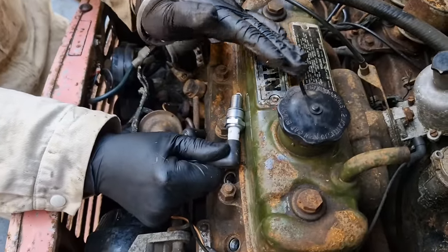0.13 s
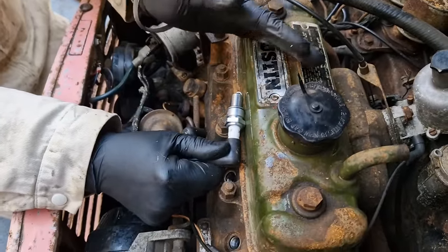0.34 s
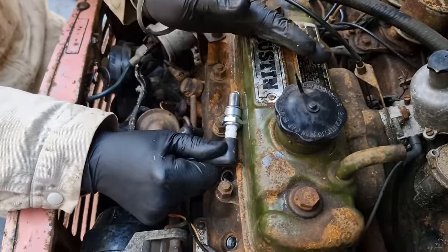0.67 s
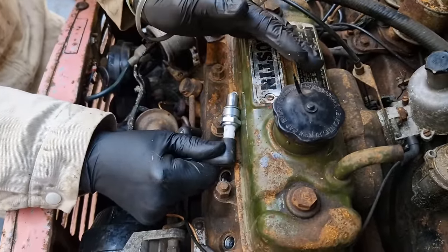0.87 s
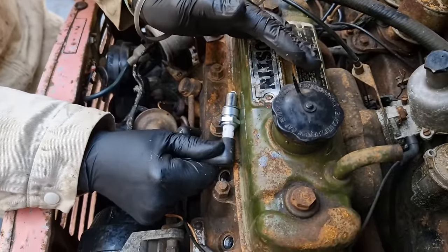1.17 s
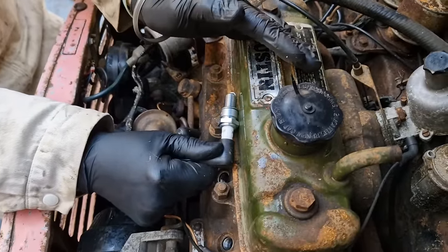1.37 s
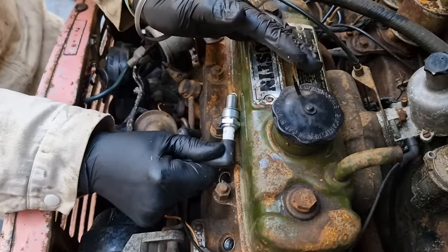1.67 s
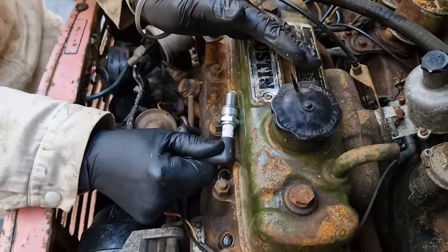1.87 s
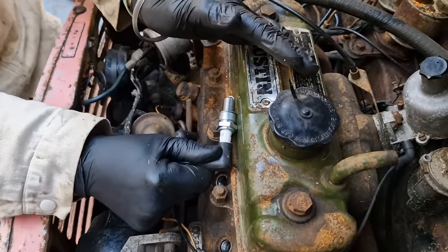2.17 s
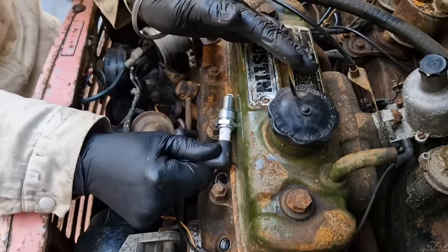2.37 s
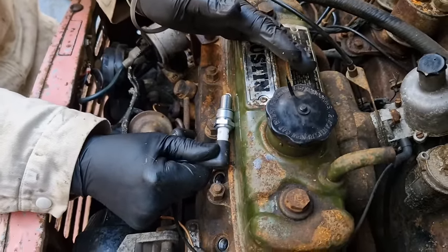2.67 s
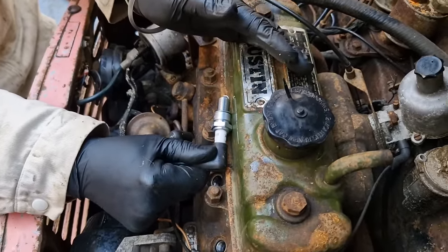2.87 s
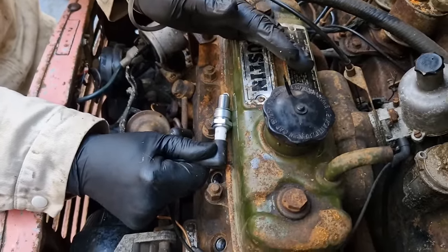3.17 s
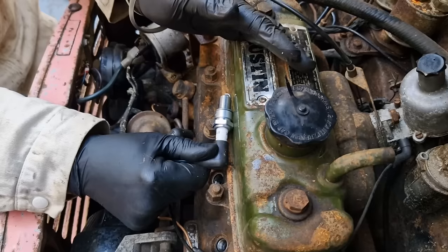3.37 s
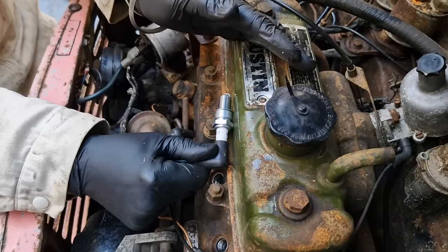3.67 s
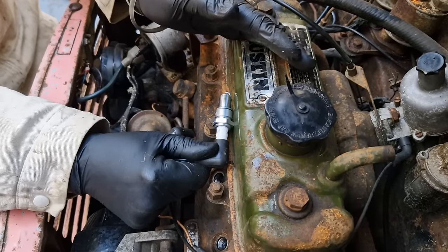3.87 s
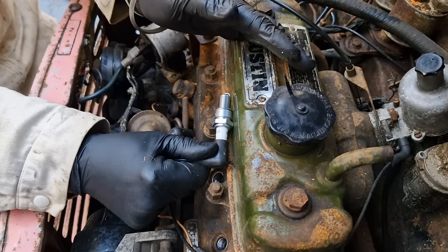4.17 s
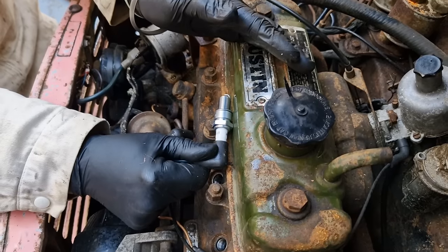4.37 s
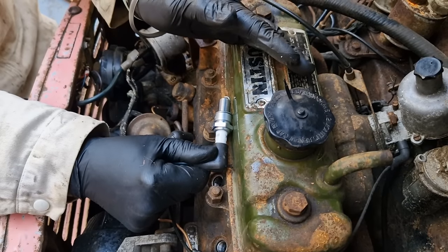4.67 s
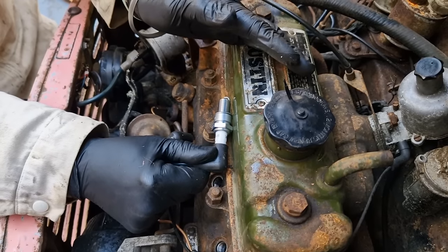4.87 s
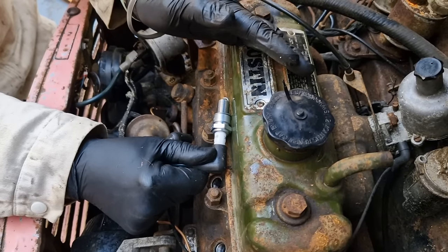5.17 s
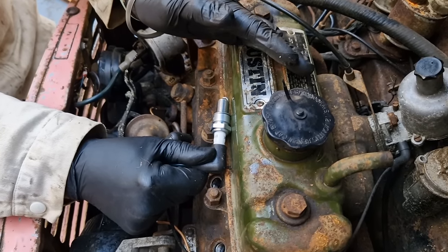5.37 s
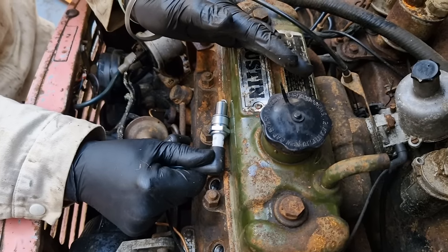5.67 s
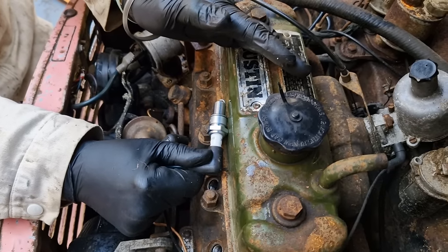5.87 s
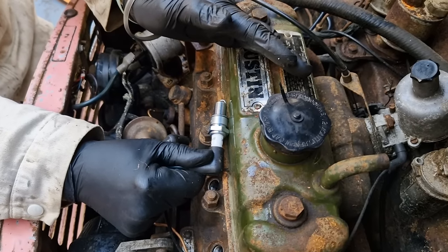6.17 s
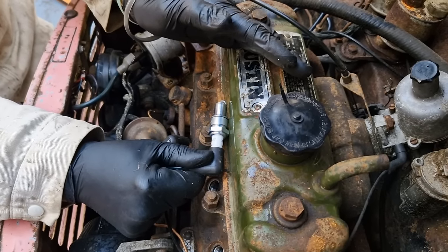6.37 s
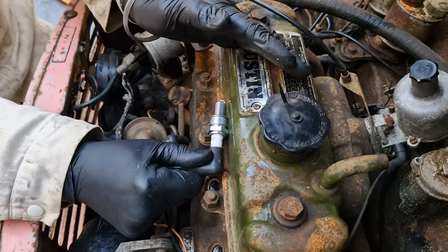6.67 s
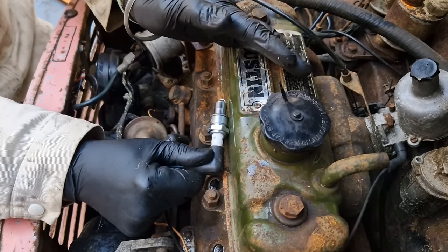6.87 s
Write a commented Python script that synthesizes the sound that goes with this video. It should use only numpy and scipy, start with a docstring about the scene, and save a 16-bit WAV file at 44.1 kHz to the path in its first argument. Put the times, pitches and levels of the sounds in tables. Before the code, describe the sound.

For almost six seconds someone shifts on a car seat: cloth scuffs, tiny trim clicks, one heavy muffled thump of the body, soft hollow knocks, a clear click and a ringing latch. Then the pinion slams loudly into the gear, the block shudders, and a harsh whirring, rattling starter quickly speeds up and cranks on to the end without ignition. Heard just above the engine in a modestly reverberant garage.

```python
"""A starter cranks an old four-cylinder engine that does not fire; garage, stereo pair just above the open bay.
The pinion slams into the ring gear and whines over casing resonances, sagging at every compression;
gears clatter as noise pulsed by each tooth, the block shakes and the brushes hiss as shaped noise.
Before that, struck modes and noise bursts make a dull body thump, floor knocks, clicks and a latch;
small squeaks and scuffs, cloth on a seat, low rumble and faint air are noise through resonances or spectra."""
import sys
import numpy as np
from scipy import signal
from scipy.fft import rfft, irfft, next_fast_len
from scipy.io import wavfile
from scipy.ndimage import map_coordinates

SR = 44100
rng = np.random.default_rng(int(sys.argv[2]) if len(sys.argv) > 2 else 0)


def unload_wav(signal):
    """Save mono or channel-first audio to the path in sys.argv[1] as 16-bit WAV at rate SR, clipped to [-1, 1]."""
    wavfile.write(
        sys.argv[1],
        SR,
        np.round(np.clip(np.atleast_2d(signal).T, -1, 1) * 32767).astype(np.int16),
    )


N = 309582
T = np.arange(N) / SR
LEFT_RIGHT = np.array([[.5], [-.5]])  # splits a left-right difference evenly between the microphones

# The starter runs up from its first bite to a steady tooth rate; the last of the speed comes slowly
START_S, BITE_HZ, CRANK_HZ, RUN_UP_S = 5.83, 175, 478, .1057
CREEP_HZ, CREEP_S = 3.5, .55
# Ring gear teeth between compressions, teeth before the first, share of speed lost at each peak
STROKE_TEETH, FIRST_TEETH, SAG = 53.6, 35.1, .03
PINION_TEETH = 9
# Harmonics of the tooth rate: multiple, level_db
MESH_HARMONICS = [(2, -3), (3, 0), (4, -2.7), (5, -1.5), (6, -3)]
# Starter casing, where the whine surges as it crosses: pitch_hz, width_hz, level_db
CASING_RESONANCES = [(718, 170, -22.5), (931, 21, -18), (1044, 55, -16), (1305, 104, -12.8), (1378, 16, -9),
                     (1435, 20, -11.2), (1488, 16, -4.8), (1531, 25, -7.2), (1676, 45, -17.5),
                     (1760, 22, -19.5), (1895, 60, -24), (2205, 50, -16.5)]
# Whine level, when the teeth are fully in mesh, and how long meshing takes
WHINE_DB, MESHED_S, MESHING_S = -25.6, 5.895, .05
# Teeth bite hard as a compression lets go: centre_s, half_length_s, extra_db
TOOTH_BITES = [(5.965, .011, 3), (6.283, .007, 5), (6.376, .008, 2), (6.468, .005, 4), (6.604, .009, 1.5),
               (6.716, .007, 3.5), (6.825, .011, 1.5)]
# Backlash leaves the teeth floating free: centre_s, level_db
BACKLASH = [(5.989, -9), (6.272, -4), (6.457, -7), (6.499, -7), (6.582, -6.5), (6.696, -3.5), (6.801, -10),
            (6.989, -11)]
BACKLASH_HALF_S = 0.0061
CHOP_DB, JUDDER_DB = 1.1, 1.0  # pulse once a pinion turn; random judder
# Gear clatter spectrum: pitch_hz, level_db
CLATTER_SPECTRUM = [(290, -63), (500, -56), (814, -12.5), (926, -21.5), (1210, -11), (1430, 0.5),
                    (1760, -14.5), (2260, -10.5), (2950, -49), (3450, -38.5), (4500, -42), (5850, -55),
                    (9900, -120)]
# Bell housing: pitch_hz, width_hz, level_db
HOUSING_RESONANCES = [(1060, 81, -8), (1590, 340, -3), (1484, 170, 2.5), (1856, 68, -1), (2218, 370, -8),
                      (2210, 40, 3), (1667, 30, 0), (2844, 200, -9)]
CLATTER_DB, CLATTER_STRAIN_DB = -24.5, 15  # at full speed; extra at a standstill
# Shaking block spectrum: pitch_hz, level_db
SHUDDER_SPECTRUM = [(18, -41), (30, -24), (59, -25), (119, -5.5), (323, -10.5), (394, -7), (604, -16),
                    (658, -10.5), (826, -21.5), (900, -6.5), (1170, -38), (1980, -120)]
SHUDDER_DB, SHUDDER_STRAIN_DB = -37, 19.5  # at full speed; extra at a standstill
# The block heaves as the crankshaft breaks loose: centre, half length, extra shake
LURCH_S, LURCH_HALF_S, LURCH_DB = 5.874, 0.016, 7.5
# Brush hiss spectrum: pitch_hz, level_db
BRUSH_SPECTRUM = [(1760, -45), (3000, -7), (3110, -20), (3500, -16.5), (5340, -4.5), (5890, -6), (6220, -8),
                  (7200, -3), (7720, -1.5), (8690, -4.5), (10100, -15), (14400, -16), (15800, -24)]
# Brush holders: pitch_hz, width_hz, level_db
HOLDER_RESONANCES = [(5160, 70, -6), (5480, 78, -4), (6280, 130, 0), (7545, 80, 5), (7812, 50, 3),
                     (8372, 35, 7), (8740, 25, 2)]
# Full hiss, the tooth rate that reaches it, power of speed below that
BRUSH_DB, BRUSH_FULL_HZ, BRUSH_GROWS = -23.5, 390, 3.7
# Starter's side of the stereo image: pitch_hz, left_minus_right_db
STARTER_LEAN = [(60, -15.5), (110, 1.5), (200, -5.5), (380, -2), (700, 1.5), (1290, -2), (2380, -9.5),
                (4400, 4), (8120, -4), (15000, 1.5)]

# Pinion shoots out, slams, grinds over tooth tips and jolts: start_s, level_db, t60_s, housing_ring_db
ENGAGE_BLOWS = [(5.802, -13, 0.3, -42), (5.8291, -2.5, 0.17, -4), (5.836, -10, .05, -9),
                (5.8787, -13, 0.1, -21), (5.889, -7.5, .05, -16), (5.899, -11, 0.046, -16),
                (6.0065, -8.5, 0.049, -10.5)]
# Spectrum of those steel blows: pitch_hz, level_db
SLAM_SPECTRUM = [(59, -43), (100, -10.5), (372, -14), (441, -23.5), (886, -7), (1100, -12.5), (1350, -19.5),
                 (1940, -10), (2200, -5), (3510, -21.5), (7850, -21.5), (15800, -32)]
# Bell housing ringing on after the slam: pitch_hz, level_db, t60_s
HOUSING_AFTER_RING = [(1325, -10, 0.68), (2190, -3, 0.77), (2120, -2.5, 1)]
AFTER_RING_DB = -21

# Soft blows on the car body, the last as the engine lurches on its mounts: start_s, level_db
BODY_THUMPS = [(1.686, -3), (1.723, -27), (1.77, -21.5), (1.886, -31), (2.019, -39.5), (2.249, -34),
               (2.326, -38.5), (5.876, -16.5), (5.918, -38)]
# Low modes of the body shell: pitch_hz, level_db, t60_s
BODY_MODES = [(110.3, -22.5, 1), (135, -4.5, 0.25), (160, 5, 0.07), (211.1, -7, 0.29), (355.5, -23.5, 0.25),
              (479.4, -28.5, 0.16), (573, -33.5, 0.32)]
# Spectrum of the body panels: pitch_hz, level_db
PANEL_SPECTRUM = [(70, -49.5), (105, -7), (136, -3), (185, -12.5), (227, -18.5), (318, -25.5), (572, -32),
                  (778, -40.5), (849, -39.5), (3000, -57), (3900, -91), (6600, -120)]
# Hollow knocks on the floor pan: start_s, peak_db
FLOOR_KNOCKS = [(2.187, -36.5), (2.568, -32.5)]
# Floor pan modes: pitch_hz, level_db, t60_s
PAN_MODES = [(121.7, -10.5, 0.49), (198, -12.5, 0.26), (279, 14.5, 0.027), (331, 0.5, 0.061),
             (363, -21, 0.33)]

# Small cabin clicks: start_s, level_db, knock_db, tick_db, part_pitch_hz, part_db
CABIN_CLICKS = [(0.177, -55, -1, -12, 1450, 2), (0.976, -52, 2.5, -20, 1800, 2.5),
                (2.791, -60.5, -0.5, -39, 2120, -13), (2.996, -55.5, 3, -36, 2040, -7),
                (3.215, -57.5, 3.5, -24, 2140, -23), (3.6079, -30.5, -9.5, -14, 2250, -7.5),
                (3.661, -49.5, -9, -9, 2480, -8), (4.43, -49, -3, -11.5, 2200, -5.5),
                (4.757, -58, -1, -10, 750, -4), (4.811, -61.5, -6, -17, 880, 0.5)]
# Cabin trim: pitch_hz, width_hz, level_db
TRIM_RESONANCES = [(425, 400, -12.5), (830, 240, 1), (1120, 210, 5), (1480, 166, 8.5), (1800, 1600, -7.5),
                   (2510, 190, 2), (3900, 180, -15)]
# Trim ringing on: pitch_hz, level_db, t60_s
TRIM_MODES = [(194, -1, .39), (318, -4, .49), (1287, -9, .4), (1389, 0, .24), (2665, -6, .17)]
TRIM_RING_DB = -4
# Steel latch snapping and dropping back: start_s, level_db, brightness_hz
LATCH_SNAPS = [(3.979, -39, 7500), (4.057, -44.5, 2000), (4.068, -49, 3500)]
# Latch modes: pitch_hz, level_db, t60_s
LATCH_MODES = [(404, -3, .22), (600, -9, .2), (840, -7, .5), (1030, -6, .15), (1249, -2, .25),
               (1416, -5, .15), (2654, -6, .15), (2770, -6, .36), (3192, -4, .15), (4032, -3, .06),
               (6675, -12, .06)]
# Latch crack spectrum: pitch_hz, level_db
CRACK_SPECTRUM = [(250, -28), (420, -3), (1400, 2), (2000, -10.5), (2700, -1), (3400, -5), (5000, -13.5),
                  (7000, -14), (9000, -34)]

# Pedal or lever squeak: centre_s, level_db, half_length_s
METAL_SQUEAKS = [(4.488, -60, 0.053)]
# Squeak resonances: pitch_hz, width_hz, level_db
SQUEAK_RESONANCES = [(6240, 260, 5), (6640, 140, 2.5), (7500, 240, -3), (9940, 90, -7)]
# Short scuffs: centre_s, level_db, half_length_s, pitch_hz
SHORT_SCUFFS = [(0.563, -64, 0.018, 2210), (1.028, -68, 0.043, 2150), (3.004, -59, 0.029, 780),
                (2.029, -50.5, 0.017, 2700), (2.088, -60, 0.011, 2380), (2.09, -53.5, 0.013, 1330),
                (2.163, -55, .018, 2250), (2.295, -54.5, 0.049, 553), (2.366, -57, 0.032, 613),
                (4.725, -70, 0.032, 3660)]

# Sleeve strokes over upholstery: centre_s, half_length_s, dull_rub_db, bright_swish_db
SLEEVE_STROKES = [(0.006, 0.075, -48, -49), (0.221, 0.044, -60, -54), (0.456, 0.03, -92, -68),
                  (0.869, 0.029, -68, -62), (1.197, 0.37, -70, -79), (1.64, 0.049, -45.5, -54),
                  (1.781, 0.046, -55.5, -58), (1.97, 0.14, -59, -74), (2.137, 0.092, -53, -64.5),
                  (2.322, 0.057, -60, -71), (2.484, 0.059, -59.5, -63.5), (2.638, 0.074, -60.5, -70.5),
                  (4.285, 0.34, -68.5, -73), (5.295, 0.046, -69, -78)]
# Weight shifts on the seat: centre_s, half_length_s, seat_rub_db, low_rumble_db
WEIGHT_SHIFTS = [(0, 0.094, -62, -41.5), (0.678, 0.21, -58, -68), (1.29, 0.11, -57, -50),
                 (1.943, 0.28, -52.5, -46.5), (2.274, 0.2, -50, -54), (2.67, 0.26, -65, -55),
                 (4.22, 0.37, -58.5, -56.5)]
# Spectra of the dull cloth rub, bright swish and seat rub: pitch_hz, level_db
CLOTH_SPECTRUM = [(410, -24), (640, -9), (850, -4.5), (1130, -9), (1370, -2), (2350, -1), (3290, -16),
                  (5000, -34), (6500, -31.5), (11000, -120)]
SWISH_SPECTRUM = [(2060, -37.5), (3500, -6), (5550, -0.5), (6790, -3.5), (7850, 2), (10100, -10.5),
                  (13100, -8), (15800, -14.5)]
SEAT_SPECTRUM = [(70, -11), (120, 3.5), (220, -5), (350, -9), (650, -18), (1000, -22), (2000, -64)]
# Light rustle under and between the strokes, until the sitter settles
FIDGET_END_S, FIDGET_FADE_S, FIDGET_CLOTH_DB, FIDGET_SWISH_DB = 2.79, 0.27, -74, -75.5

# Spectra of the low rumble and the air: pitch_hz, level_db
RUMBLE_SPECTRUM = [(12, -27.5), (20, 12), (92, 13), (157, 3.5), (190, -2), (238, -9), (316, -10.5),
                   (500, -36), (650, -45.5), (1100, -120)]
AIR_SPECTRUM = [(180, -16.5), (300, -6.5), (480, -20), (830, -12.5), (1110, -17.5), (1920, -15),
                (4330, -33), (7740, -24), (10500, -32), (15800, -50.5)]
RUMBLE_DB, AIR_DB = -53.5, -69.5
HUSH_S, HUSH_FADE_S, HUSH_DB = 5.02, 0.21, -3.5  # quieter from here on

# Likeness of noise at the two microphones: pitch_hz, likeness (1 = identical)
STEREO_LIKENESS = [(100, 1), (300, 0.88), (700, 0.74), (1500, 0.025), (3000, 0.048), (7000, 0.053),
                   (15000, 0.165)]
# Garage reverberation: pitch_hz, t60_s
GARAGE_DECAY = [(120, 0.93), (1000, 0.45), (4000, 0.36), (12000, 0.067)]
TOP_HZ = 15870  # the recorder's band limit


def starter():
    """Gear whine, tooth impacts in the housing, the shaking block and the brushes on the commutator."""
    strain, load, tooth_hz = crank_motion()
    teeth = np.cumsum(tooth_hz) / SR
    shaft = 2 * np.pi * teeth / PINION_TEETH
    grip_db = grip(shaft)
    motor = clatter(teeth, strain, load, grip_db) + shudder(strain, load)
    motor = motor + brushes(teeth, shaft, tooth_hz) + whine(teeth, shaft, grip_db)
    running = np.interp(T, [5.828, 5.845], [0, 1])
    return filtered(running * motor, lambda hz: amp(along(STARTER_LEAN, hz) * LEFT_RIGHT))


def crank_motion():
    """Strain (1 stalled, 0 full speed), compression load (-1 to 1) and tooth rate, slowed by compression."""
    since = np.maximum(T - START_S, 0)
    run_up = (CRANK_HZ - BITE_HZ) * np.exp(-since / RUN_UP_S)
    free_hz = CRANK_HZ - run_up - CREEP_HZ * np.exp(-since / CREEP_S)
    teeth = np.cumsum(free_hz * (T > START_S)) / SR
    load = np.cos(2 * np.pi * (teeth - FIRST_TEETH) / STROKE_TEETH)
    return 1 - free_hz / CRANK_HZ, load, free_hz * (1 - SAG * load)


def grip(shaft):
    """How hard the teeth bear, in dB: bites, backlash and the judder of a worn pinion."""
    bites = sum(db * swell(s, half_s, 0) for s, half_s, db in TOOTH_BITES)
    slacks = sum(db * swell(s, BACKLASH_HALF_S, 0) for s, db in BACKLASH)
    return bites + slacks + CHOP_DB * np.cos(shaft) + JUDDER_DB * wobble(130)


def whine(teeth, shaft, grip_db):
    """Tooth harmonics sweep across casing resonances; the slightly eccentric pinion adds sidebands."""
    angle = 2 * np.pi * teeth + .03 * np.sin(shaft) + .025 * wobble(170) + .035 * wobble(30)
    angle = angle + 0.41 * LEFT_RIGHT  # radians: the sound reaches the left microphone first
    tones = 0
    for multiple, db in MESH_HARMONICS:
        contact = 1 + .18 * wobble(80)  # teeth bear unevenly
        tones = tones + amp(db) * contact * np.sin(multiple * angle)
    meshed = 1 - until(MESHED_S, MESHING_S)
    hum = amp(-42.7) * np.sin(3 * shaft)
    gear_tone = amp(WHINE_DB + grip_db) * resonate(meshed * tones, CASING_RESONANCES)
    return garage(gear_tone + meshed * hum, wet_db=-17)


def clatter(teeth, strain, load, grip_db):
    """Each tooth strikes a decaying noise pulse that rings the bell housing; strain makes it rattle more."""
    pulse = np.exp(-(teeth % 1) / 0.48) + 0.11
    impacts = scatter(contact_noise(shared=0.52) * pulse, t60=0.08, share=0.6)
    impacts = impacts * amp(1.14 * wobble(60) - 0.2 * load)  # most when the load lets go
    rattle = amp(CLATTER_DB + CLATTER_STRAIN_DB * strain) * coloured(impacts, CLATTER_SPECTRUM)
    housing = amp(-30.5) * resonate(impacts, HOUSING_RESONANCES)
    return amp(grip_db / 3) * (rattle + housing)


def shudder(strain, load):
    """Scattered noise for the shaking block, stronger under strain and as the crankshaft breaks loose."""
    level_db = SHUDDER_DB + SHUDDER_STRAIN_DB * strain + LURCH_DB * swell(LURCH_S, LURCH_HALF_S, 0)
    shaking = scatter(noise(), t60=0.59, share=0.52)
    return amp(level_db + 0.28 * load) * coloured(shaking, SHUDDER_SPECTRUM)


def brushes(teeth, shaft, tooth_hz):
    """Brush friction hisses and rings the holders, growing with speed up to a limit."""
    level_db = BRUSH_DB + BRUSH_GROWS * 20 * np.log10(np.minimum(tooth_hz / BRUSH_FULL_HZ, 1))
    scrape = scatter(contact_noise(shared=.75), t60=.13, share=.55)
    scrape = scrape * (1 + .23 * np.sin(shaft))  # harder once a turn
    scrape = scrape * (1 + .25 * np.sin(4 * np.pi * teeth))  # chatter from bar to bar, twice a tooth
    hiss = amp(level_db) * coloured(scrape, BRUSH_SPECTRUM)
    return hiss + amp(level_db - 2) * resonate(scrape, HOLDER_RESONANCES)


def engage():
    """Steel blows, noise bursts and housing rings, as the pinion is thrown into mesh and takes up slack."""
    out = np.zeros((2, N))
    for s, db, t60, ring_db in ENGAGE_BLOWS:
        blow = fade(t60, attack=0.0005) * coloured(noise(size=SR), SLAM_SPECTRUM)
        add(out, s, amp(db - 11) * blow)
        add(out, s, amp(ring_db) * ring([(1364, 2, 0.069), (1502, 0, 0.087)], attack=0.000095))
    add(out, START_S, amp(AFTER_RING_DB) * ring(HOUSING_AFTER_RING, attack=0.0047))
    return garage(out, wet_db=-7)


def thumps():
    """The body shell booms at its low modes with its panels; the floor pan knocks hollowly."""
    out = np.zeros((2, N))
    for s, db in BODY_THUMPS:
        panels = amp(-10.5) * fade(0.47, attack=0.005) * coloured(noise(size=SR), PANEL_SPECTRUM)
        add(out, s, amp(db) * (panels - ring(BODY_MODES, attack=0.0055)))
    for s, db in FLOOR_KNOCKS:
        add(out, s, amp(db) * ring(PAN_MODES, attack=0.01))
    # panels radiate no deep bass
    out = signal.sosfilt(signal.butter(4, 97, "highpass", fs=SR, output="sos"), out)
    return garage(out, wet_db=-18.0)


def clicks():
    """Each click rings the trim and its own small part, with a hollow knock, bright tick and dying rattle."""
    out = np.zeros((2, N))
    for s, db, knock_db, tick_db, hz, part_db in CABIN_CLICKS:
        trim = amp(2.0) * fade(0.086, attack=0.0011) * resonate(noise(size=SR), TRIM_RESONANCES)
        part_peaks = [(hz, 0.27 * hz, 0), (1.12 * hz, 0.44 * hz, -3), (1.57 * hz, 0.13 * hz, -8)]
        part = amp(part_db) * fade(0.23, attack=0.00038) * resonate(noise(size=SR), part_peaks)
        hollow = resonate(noise(size=SR), [(198, 26, 4), (350, 180, -8)])
        knock = amp(knock_db - 0.5) * fade(0.3, attack=0.005) * hollow
        tick = amp(tick_db) * fade(0.31, attack=0.0025) * coloured(noise(size=SR), SWISH_SPECTRUM)
        rattle_gain = amp(-28.0 + 1.5 * wobble(74)[:SR]) * fade(0.42, attack=0.0092)
        rattle = rattle_gain * resonate(noise(size=SR), TRIM_RESONANCES)
        trim_ring = amp(TRIM_RING_DB) * ring(TRIM_MODES, attack=0.0015)
        add(out, s, amp(db - 0.5) * (trim + trim_ring + part + knock + tick + rattle))
    return garage(scatter(out, t60=0.04, share=0.21), wet_db=-8.5)


def latch():
    """Each snap cracks and leaves the steel ringing, dulled above its own brightness limit."""
    out = np.zeros((2, N))
    for s, db, bright_hz in LATCH_SNAPS:
        crack = amp(-3.0) * fade(0.21, attack=0.00076) * coloured(noise(size=SR), CRACK_SPECTRUM)
        snap = amp(db) * (ring(LATCH_MODES, attack=0.00091) + crack)
        add(out, s, filtered(snap, lambda hz: 1 / np.hypot(1, (hz / bright_hz) ** 2)))
    return garage(scatter(out, t60=0.035, share=0.4), wet_db=-11.5)


def squeaks():
    """Dry metal rubs briefly on a few high resonances; each scuff sounds one lower resonance."""
    squeal = sum(swell(s, half_s, db) for s, db, half_s in METAL_SQUEAKS)
    out = squeal * resonate(noise(), SQUEAK_RESONANCES)
    rub = noise()
    for s, db, half_s, hz in SHORT_SCUFFS:
        out = out + swell(s, half_s, db) * resonate(rub, [(hz, .25 * hz, 0)])
    return garage(out * amp(0.81 * wobble(90)), wet_db=-9.0)


def rustle():
    """Cloth drags over upholstery in small uneven catches; the seat rubs and rumbles as weight shifts."""
    rub = scatter(noise(), t60=0.11, share=0.43) * amp(1.6 * wobble(110))
    fidget = until(FIDGET_END_S, FIDGET_FADE_S) * amp(2.2 * wobble(12))
    cloth = amp(FIDGET_CLOTH_DB) * fidget + sum(swell(s, half_s, db) for s, half_s, db, _ in SLEEVE_STROKES)
    swish = amp(FIDGET_SWISH_DB) * fidget + sum(swell(s, half_s, db) for s, half_s, _, db in SLEEVE_STROKES)
    seat = sum(swell(s, half_s, db) for s, half_s, db, _ in WEIGHT_SHIFTS)
    heave = sum(swell(s, half_s, db) for s, half_s, _, db in WEIGHT_SHIFTS)
    sleeve = cloth * coloured(rub, CLOTH_SPECTRUM) + swish * coloured(rub, SWISH_SPECTRUM)
    return sleeve + seat * coloured(rub, SEAT_SPECTRUM) + heave * coloured(noise(), RUMBLE_SPECTRUM)


def background():
    """A low rumble and faint air, both a little quieter from just before the start."""
    hush_db = HUSH_DB * (1 - until(HUSH_S, HUSH_FADE_S))
    rumble = amp(RUMBLE_DB + 0.3 * wobble(20)) * coloured(noise(), RUMBLE_SPECTRUM)
    air = amp(AIR_DB + 0.75 * wobble(9.9)) * coloured(noise(), AIR_SPECTRUM)
    return amp(hush_db) * (rumble + air)


def garage(x, wet_db):
    """x with the room's answer, 4 ms later; the treble dies first."""
    hz, t, z = signal.stft(noise(size=SR), SR, nperseg=256)
    decay = amp(-60 * t / along(GARAGE_DECAY, hz)[:, None])
    tail = signal.istft(z * decay, SR, nperseg=256)[1]
    tail = np.pad(tail / np.linalg.norm(tail[0]), ((0, 0), (SR // 250, 0)))
    return x + amp(wet_db) * signal.fftconvolve(np.atleast_2d(x), tail, axes=1)[:, :N]


def scatter(x, t60, share):
    """Dense reflections between nearby panels carve fine fixed peaks into x."""
    tail = noise(size=SR) * fade(t60, attack=0.00017)
    echoes = signal.fftconvolve(x, tail / np.linalg.norm(tail[0]), axes=1)[:, :x.shape[-1]]
    return np.sqrt(1 - share) * x + np.sqrt(share) * echoes


def noise(size=N):
    """White stereo noise, alike in the bass and nearly unrelated in the treble."""
    def mid_side(hz):
        turn = np.arccos(np.clip(along(STEREO_LIKENESS, hz), -1, 1)) / 2
        return np.array([np.cos(turn), np.sin(turn)])
    mid, side = filtered(rng.standard_normal((2, size)), mid_side)
    return np.array([mid + side, mid - side])


def contact_noise(shared):
    """Noise of one small contact: a share of it reaches both microphones, the left one first."""
    lead_s = .00012
    direct = filtered(noise()[:1], lambda hz: np.exp(2j * np.pi * hz * lead_s * LEFT_RIGHT))
    return np.sqrt(shared) * direct + np.sqrt(1 - shared) * noise()


def coloured(x, spectrum):
    """x with a (Hz, dB) spectrum, at rms 1."""
    return unit(filtered(x, lambda hz: amp(along(spectrum, hz))))


def resonate(x, peaks):
    """x through (Hz, width Hz, dB) resonances of alternating sign, at rms 1."""
    def response(hz):
        total = 0
        for k, (centre, width, db) in enumerate(peaks):
            damping = 1j * hz * width
            total = total + (-1) ** k * amp(db) * damping / (centre * centre - hz * hz + damping)
        return total
    return unit(filtered(x, response))


def filtered(x, response):
    """x times a response of frequency."""
    n = x.shape[-1]
    m = next_fast_len(n + SR // 4)
    return irfft(rfft(x, m) * response(np.fft.rfftfreq(m, 1 / SR)), m)[..., :n]


def ring(modes, attack):
    """One second of (Hz, dB, t60 s) modes, at peak 1."""
    x = sum(amp(db) * fade(t60, attack) * np.sin(2 * np.pi * hz * T[:SR]) for hz, db, t60 in modes)
    return x / np.abs(x).max()


def fade(t60, attack):
    """One second of a struck envelope, times in seconds."""
    return amp(-60 * T[:SR] / t60) * (1 - np.exp(-T[:SR] / attack))


def swell(s, half_s, db):
    """A smooth rise and fall around s seconds."""
    return amp(db) * np.exp(-((T - s) / half_s) ** 2)


def until(end_s, fade_s):
    """1, fading to 0 by end_s."""
    return np.clip((end_s - T) / fade_s, 0, 1)


def wobble(rate):
    """A smooth random curve, rate knots a second."""
    return map_coordinates(rng.standard_normal(int(N * rate / SR) + 4), [T * rate])


def along(points, hz):
    """(Hz, value) points read on a log frequency axis."""
    f, v = np.transpose(points)
    return np.interp(np.log(hz + 1), np.log(f + 1), v)


def amp(db):
    """Decibels to gain."""
    return 10 ** (np.asarray(db) / 20)


def unit(x):
    """x at rms 1."""
    return x / np.sqrt(np.mean(x ** 2) + 1e-20)


def add(out, s, x):
    """Mix x into out at s seconds."""
    part = out[..., round(s * SR):][..., :x.shape[-1]]
    part += x[..., :part.shape[-1]]


def scene():
    """All sources at the two microphones."""
    return starter() + engage() + thumps() + clicks() + latch() + squeaks() + rustle() + background()


def record(dry):
    """The recorder clips at full scale, then drops everything above its band limit."""
    return filtered(np.clip(dry, -1, 1), lambda hz: hz < TOP_HZ)


dry = scene()
out = record(dry)
unload_wav(out)
```